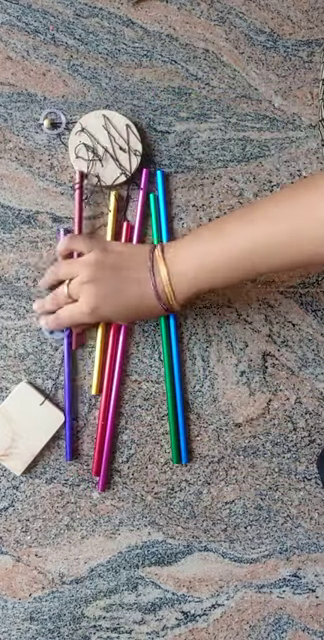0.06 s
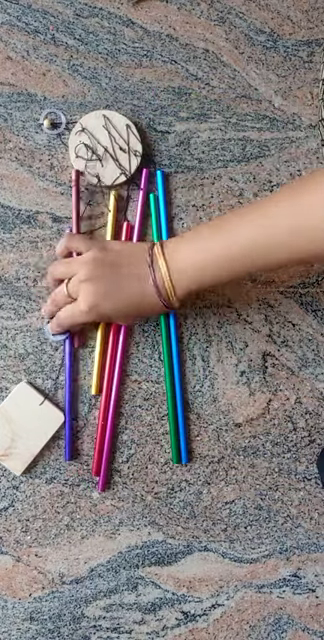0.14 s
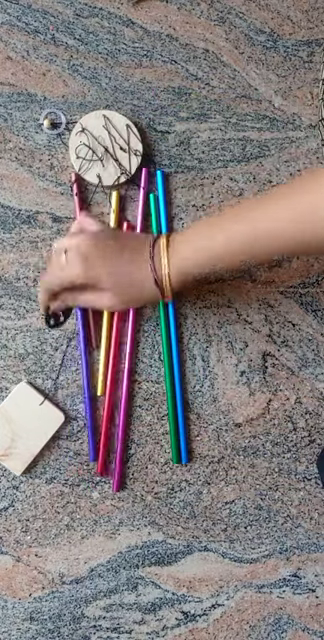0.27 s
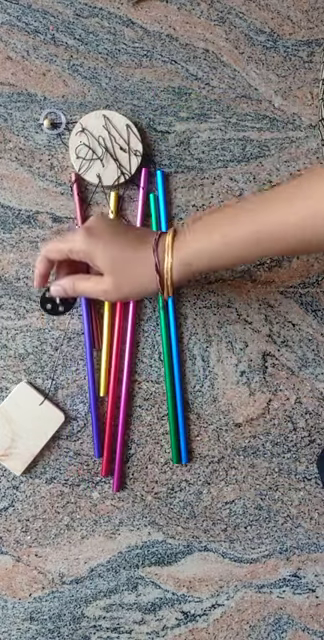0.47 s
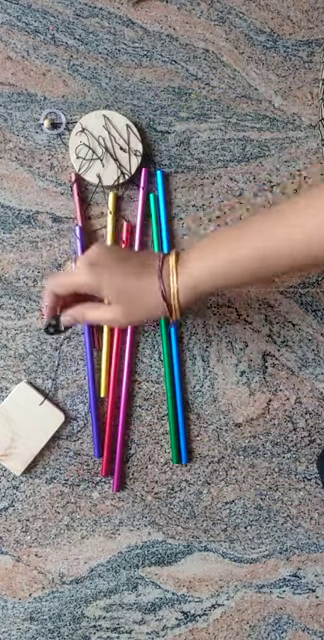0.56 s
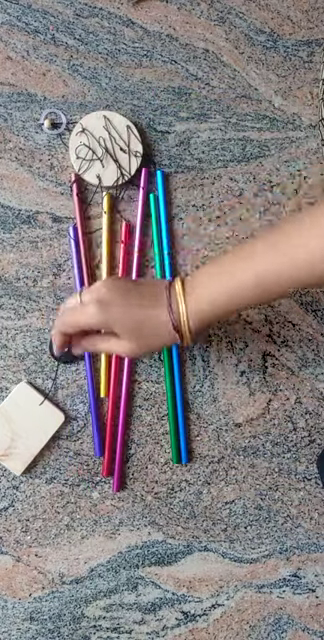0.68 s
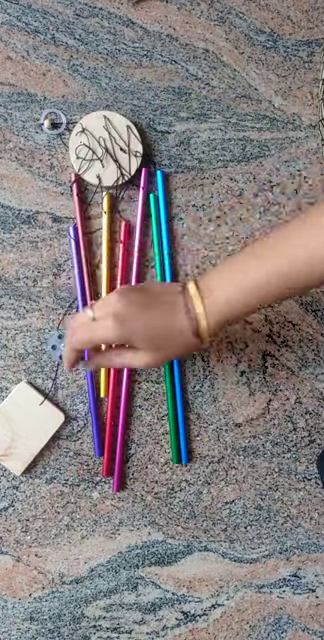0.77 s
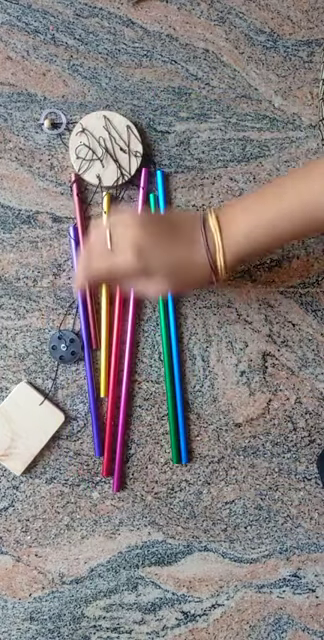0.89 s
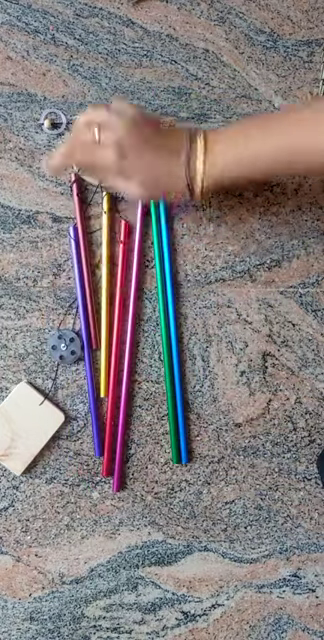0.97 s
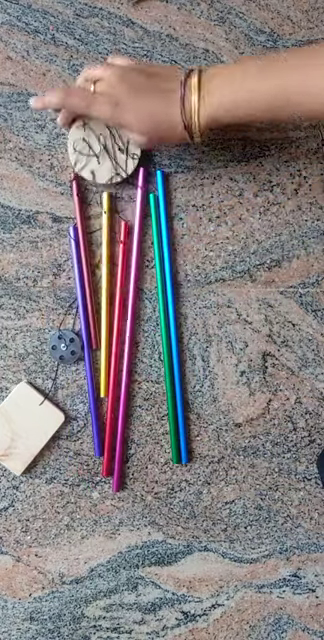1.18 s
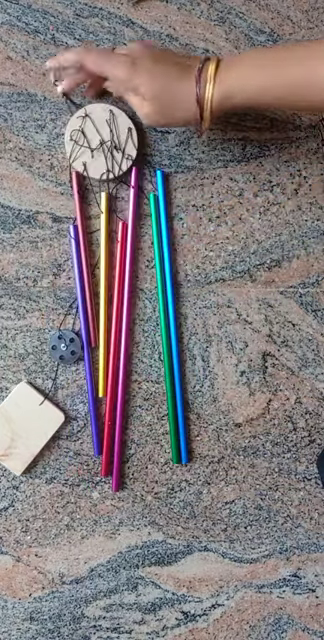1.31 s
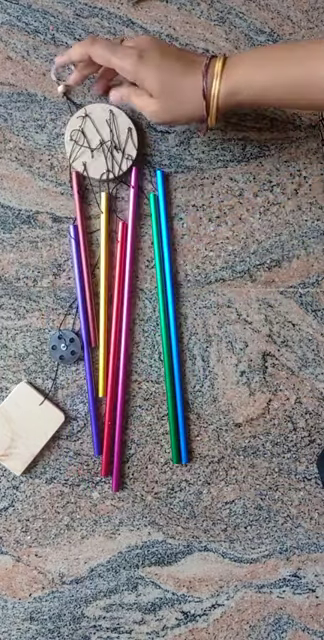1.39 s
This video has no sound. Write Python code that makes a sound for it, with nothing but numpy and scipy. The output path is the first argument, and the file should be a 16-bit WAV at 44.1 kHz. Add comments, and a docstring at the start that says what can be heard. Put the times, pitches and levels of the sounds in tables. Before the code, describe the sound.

Thin metal chime tubes clink as a hand moves them on a stone floor. Light ticks lead to the loudest bright clatter at about 0.2 seconds, and a second cluster follows near 0.7 seconds, each ringing briefly. A softer clink comes around 1.25 seconds. A faint motor hum and low room noise continue underneath in a small, hard room.

```python
"""Thin metal chime tubes, nudged by a hand on a stone floor, knock, chatter and ring briefly.
Each impact excites a tube's bending modes: motion against the stone is damped fast, motion along
it rings on. Skin and string brush the stone, and a small hard room reverberates. Behind them
a motor hums and a far horn-like tone swells faintly, over low room noise and rumble."""
import sys
import numpy as np
from scipy import signal
from scipy.fft import rfft, irfft
from scipy.io import wavfile
from scipy.ndimage import uniform_filter1d

SR = 44100
rng = np.random.default_rng(int(sys.argv[2]) if len(sys.argv) > 2 else 0)


def wav_record(signal):
    """Record a signal, one row per channel, as 16-bit PCM in the file named by sys.argv[1]."""
    frames = np.transpose(np.atleast_2d(signal))
    bounded = np.clip(frames, -1, 1)
    # unit amplitude maps onto the largest positive 16-bit level
    quanta = np.round(bounded * 32767).astype(np.int16)
    wavfile.write(sys.argv[1], SR, quanta)


N = 63945

CHATTER_PER_S, REBOUND_DB, TILT_PIVOT_HZ = 450, -2, 5800
# Bending modes of each tube: f/Hz, relative level/dB, decay time T60/s
TUBE_MODES = { "a": [(915.4, -6.5, 0.1), (2464, -3.5, .3), (4735, -1.5, 0.66), (7480, 1.5, .25),
              (10990, -6.5, 0.26), (14790, -13, 0.17)], "b": [(2465, -10, 0.25), (4857, 0, 0.11),
              (7697, 6, 0.25), (11165, -6, 0.14), (15040, -3.5, 0.095)], "c": [(3122, -9, 0.292),
              (5950, 4.5, 0.29), (9680, -12.5, 0.19), (13100, -21.5, .12)], "d": [(3983, -14, 0.15),
              (6392, 5.5, 0.14), (9290, -8, 0.1), (12640, -17.5, 0.16)], "e": [(2050, -18, 0.12),
              (4380, 1, .16), (8230, -3, 0.099), (13010, -21, .12)], "f": [(5130, 3, 0.24), (6930, -7, .1),
              (13530, -22, 0.12)], "g": [(3040, -6, 0.29), (5790, 9, 0.17), (9200, -3.5, .15),
              (12510, -19, 0.13)], "h": [(4574, -2, 0.083), (8380, -3, 0.37), (13230, -23, 0.14)],
              "i": [(6810, -6.5, 0.24), (7870, -2, 0.14), (9350, -17, 0.32), (10950, -18, 0.22)],
              "j": [(1273, 2.5, 0.59), (11750, -2, 0.13)], }
# Knocks on each tube: t/s, level/dB, chatter length/s, hardness as spectral tilt/(dB per octave)
TUBE_KNOCKS = { "a": [(.001, -49, 0.011, -1.1), (.018, -51, 0.0093, -3), (.123, -58.5, 0.036, 1),
               (.656, -34, 0.006, -2.36), (.674, -34.5, 0.0066, 8.5), (.691, -43, 0.026, 1.1),
               (1.239, -66, 0.0031, -4.1)], "b": [(.002, -48.5, 0.022, -1.5), (.046, -52, 0.023, -8.5),
               (.135, -50, 0.06, -5), (.192, -37.5, 0.002, -3), (.211, -30.5, 0.021, 6),
               (.245, -45, 0.0078, -10), (.379, -56, 0.0092, 0), (.621, -54.5, 0.035, 5.5),
               (.656, -35, 0.027, 4.5), (.681, -30.5, 0.0068, .1), (.700, -37, 0.0056, -2.8),
               (.976, -87, .015, 9), (1.289, -65.5, .005, 0)], "c": [(.201, -32, 0.0068, -4.3),
               (.213, -24, .008, 8), (.377, -46.5, 0.016, .1), (.537, -73, .004, 12), (.665, -41.5, .02, 5),
               (1.238, -52.5, .005, 5.5), (1.265, -66, .004, 1)], "d": [(.211, -28.5, 0.0023, 7),
               (.215, -18, .004, 2), (.222, -24, 0.0074, 3), (.227, -35.5, .003, 3.8),
               (.241, -38.5, 0.01, -1.3), (.536, -61, .005, -9.5), (.664, -33, 0.019, 8),
               (1.238, -40, 0.021, -13), (1.286, -60, 0.0071, -13)], "e": [(.219, -31, 0.012, -4.2),
               (.245, -60.5, 0.027, -4.7), (.657, -27, 0.019, -0.5), (.680, -37, 0.013, 5.5)],
               "f": [(.647, -45, .004, -4.1), (.654, -31, 0.017, -13.5)], "g": [(.001, -50.5, .012, 8.2),
               (.021, -52, 0.013, .1), (.655, -45, 0.031, -11)], "h": [(.001, -38.5, 0.0056, -16),
               (.022, -49.5, .005, -1.1), (.144, -42.5, 0.059, 0.5), (.168, -52, 0.015, 3),
               (.183, -43, 0.0093, 2.1), (.192, -29.5, 0.017, .1), (.207, -49, 0.0034, 2.1),
               (.378, -44, 0.0033, -13), (.624, -50.5, 0.027, -2), (1.290, -54, 0.0092, 5)],
               "i": [(.001, -42.5, 0.0077, -3), (.193, -45.5, .005, .1), (.214, -31, 0.0064, -10),
               (.377, -43, 0.0084, .1), (.628, -53, 0.015, 2.1), (.655, -56, 0.019, -15)],
               "j": [(.215, -61.5, .005, -4.5), (.972, -84.5, 0.019, 8)], }
def tubes():
    """Modal superposition: each blow and its rebounds drive all the bending modes of a tube."""
    ringing, touches = np.zeros(N), np.zeros(N)
    for name, modes in TUBE_MODES.items():
        pushes = np.zeros((len(modes), N))
        for start, db, length, tilt_db in TUBE_KNOCKS[name]:
            jitter, strength, scatter = rng.random((3, 24))
            delay = (np.arange(24) + jitter - jitter[0]) / CHATTER_PER_S
            impulse = np.where(delay > 0, amp(REBOUND_DB) * (.5 + strength), 1)
            impulse *= np.clip(2 - 2 * delay / length, 0, 1)  # the rebounds die away
            impulse *= amp(db) / np.sqrt(np.sum(impulse ** 2))
            at = np.clip(((start + delay) * SR).astype(int), 0, N - 1)
            np.add.at(touches, at, impulse)
            for k, (hz, mode_db, _) in enumerate(modes):
                drive_db = mode_db + tilt_db * np.log2(hz / TILT_PIVOT_HZ)
                scatter_db = 2 * scatter[k] - .5
                np.add.at(pushes[k], at, impulse * amp(drive_db + scatter_db))
        for push, (hz, _, t60) in zip(pushes, modes):
            ringing += bending_mode(push, hz, t60)
    return butterworth(ringing + contact_ticks(touches), 2, 1570, "high")  # thin tubes radiate few lows


def bending_mode(push, hz, t60, contact_t60=.004, pressed_detune=.004, pressed_t60_share=.22):
    """Contact damping: bending against the stone dies fast; along it, a little lower, it rings on."""
    drive = resonator(push, hz, contact_t60) * np.log(1000) / (contact_t60 * SR)
    pressed = resonator(drive, hz * (1 + pressed_detune), t60 * pressed_t60_share).imag
    free = resonator(drive, hz, t60).imag
    wobble = amp(-15.5 + 3.5 * wander(80))  # rolling tubes turn their sound to and fro
    return pressed + wobble * free


def contact_ticks(touches, decay_s=.0028, band_hz=(2840, 9200), gain_db=-6.5):
    """Impact noise: each touch gives a bright burst that decays exponentially."""
    envelope = signal.lfilter([1], [1, -np.exp(-1 / (decay_s * SR))], touches)
    return amp(gain_db) * butterworth(envelope * rng.standard_normal(N), 3, band_hz, "band")


# Strokes on the stone: t/s, length/s, level at the crest/dB, centre f/Hz, filter width/Hz
BRUSH_STROKES = [(.0, .16, -78, 1500, 800), (.19, .06, -62, 1600, 900), (1.05, .1, -90, 3950, 400),
                 (1.09, .13, -86, 4600, 350), (1.1, .12, -84, 2600, 900), (1.212, .008, -74, 8000, 4000),
                 (1.345, .05, -70, 4500, 3000)]
def brushes(t):
    """Friction noise: skin and string brush the stone with a rough hiss that swells and dies."""
    out = np.zeros(N)
    for start, length, db, hz, width in BRUSH_STROKES:
        swell = np.sin(np.pi * np.clip((t - start) / length, 0, 1))
        roughness = amp(3.3 * wander(151))
        peak = signal.iirpeak(hz, hz / width, SR)
        hiss = signal.lfilter(*peak, signal.lfilter(*peak, rng.standard_normal(N)))
        out += swell * roughness * at_level(hiss, db)
    return out


def room(direct, tail_db=-8.5, t60=.28, treble_t60=.17, crossover_hz=8480):
    """Reverberation: dense reflections form an exponential tail whose treble dies first."""
    t = np.arange(SR // 2) / SR
    reflections = rng.standard_normal(len(t)) * np.clip(t / .012, 0, 1)
    low = butterworth(reflections, 2, crossover_hz, "low")
    tail = low * amp(-60 * t / t60) + (reflections - low) * amp(-60 * t / treble_t60)
    tail *= amp(tail_db) / np.sqrt(np.sum(tail ** 2))
    return direct + signal.fftconvolve(direct, tail)[:N]


# Fundamental of the motor: t/s, f/Hz
MOTOR_PITCH = [(0, 366.5), (.2, 371.5), (.3, 371.1), (1.45, 368.6)]
# Harmonics of the motor: harmonic number, rms level/dB
MOTOR_HARMONICS = [(1, -53), (2, -63.5), (3, -73), (4, -92.5), (5, -86.5)]
def motor_hum(t, waver_db=.97):
    """Harmonic series: a motor's drifting fundamental and weak overtones, each wavering in level."""
    phase = 2 * np.pi * np.cumsum(curve(t, MOTOR_PITCH)) / SR
    return sum(np.sqrt(2) * amp(db + waver_db * np.sqrt(k) * wander(29)) * np.sin(k * phase + k)
               for k, db in MOTOR_HARMONICS)


# Partials of the far tone: f/Hz, rms level at full swell/dB
FAR_PARTIALS = [(2537, -92.5), (2977, -84), (3398, -79)]
def far_tone(t, start_s=.93, rise_s=.17, release_s=1.26, fall_s=.2, flicker_db=4):
    """Amplitude and phase modulation: three thin horn-like partials flicker and fade in and out."""
    swell = np.clip((t - start_s) / rise_s, 0, 1) * np.clip(1 - (t - release_s) / fall_s, 0, 1)
    tone = np.zeros(N)
    for hz, db in FAR_PARTIALS:
        amplitude = np.sqrt(2) * amp(db + flicker_db * wander(45.8))
        tone += amplitude * np.sin(2 * np.pi * hz * t + .13 * wander(41))
    return swell * tone


# Spectral density of the room noise: f/Hz, relative level/dB
NOISE_SPECTRUM = [(25, -29), (60, -16), (130, -17), (230, -21.5), (320, 2.5), (480, -5), (900, -13),
                  (1300, -25), (2500, -37), (6000, -44), (12000, -55.5)]
# Room noise within its reference band: t/s, rms level/dB
NOISE_LEVEL = [(0.0, -65), (0.836, -68.5), (1.202, -67.5), (1.324, -67.5), (1.45, -67)]
def room_noise(t, reference_hz=(420, 700)):
    """Spectrally shaped noise: a mostly low background whose level drifts slowly."""
    hz = np.maximum(np.arange(N // 2 + 1) * SR / N, 1)
    point_hz, point_db = np.array(NOISE_SPECTRUM).T
    spectrum = rfft(rng.standard_normal(N)) * amp(np.interp(np.log(hz), np.log(point_hz), point_db))
    reference = irfft(spectrum * (hz > reference_hz[0]) * (hz < reference_hz[1]), N)
    return irfft(spectrum, N) / reference.std() * amp(curve(t, NOISE_LEVEL))


# Envelope of the rumble: t/s, rms level/dB
RUMBLE_LEVEL = [(0.0, -68.5), (0.568, -64.5), (0.666, -74), (1.118, -71), (1.166, -56.5), (1.244, -73.5),
                (1.28, -61.5), (1.45, -65.5)]
def rumble(t, band_hz=(50, 200)):
    """Band-limited noise: a low rumble that comes and goes."""
    low = butterworth(rng.standard_normal(N), 2, band_hz, "band")
    return at_level(low, curve(t, RUMBLE_LEVEL))


def resonator(x, hz, t60):
    """Damped oscillator: the complex response of one mode to the pushes in x."""
    pole = np.exp(2j * np.pi * hz / SR - np.log(1000) / (t60 * SR))
    return signal.lfilter([1], [1, -pole], x)


def wander(per_s):
    """Low-pass noise: a smooth random drift of unit standard deviation."""
    span = int(SR / per_s)
    drift = uniform_filter1d(uniform_filter1d(rng.standard_normal(N), span), span)
    return drift / drift.std()


def butterworth(x, order, hz, kind):
    return signal.sosfilt(signal.butter(order, hz, kind, fs=SR, output="sos"), x)


def curve(t, points):
    return np.interp(t, *np.array(points).T)


def amp(db):
    return 10 ** (np.asarray(db) / 20)


def at_level(x, db):
    return x * amp(db) / np.sqrt(np.mean(x ** 2))


def scene():
    """Superposition: tubes and brushing reverberate, and the background adds to them in one channel."""
    t = np.arange(N) / SR
    return (room(tubes() + brushes(t)) + motor_hum(t) + far_tone(t) + room_noise(t) + rumble(t))[None]


def record(dry, threshold_db=-27.5, ratio=1.42, averaging_s=.012, top_hz=15450):
    """Compression and band limiting: the recorder turns loud clinks down a little and cuts the top."""
    pole = np.exp(-1 / (averaging_s * SR))
    rms = np.sqrt(signal.lfilter([1 - pole], [1, -pole], dry ** 2)) + 1e-9
    gain = np.minimum(amp(threshold_db) / rms, 1) ** (1 - 1 / ratio)
    return signal.sosfilt(signal.ellip(7, .2, 70, top_hz, fs=SR, output="sos"), dry * gain)


dry = scene()
out = record(dry)
wav_record(out)
```